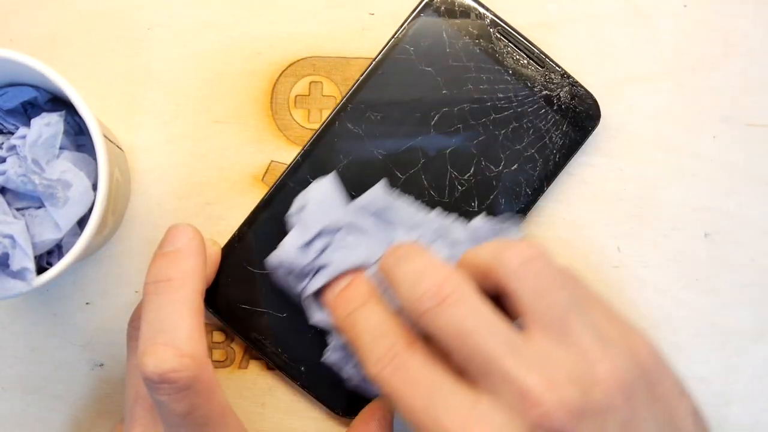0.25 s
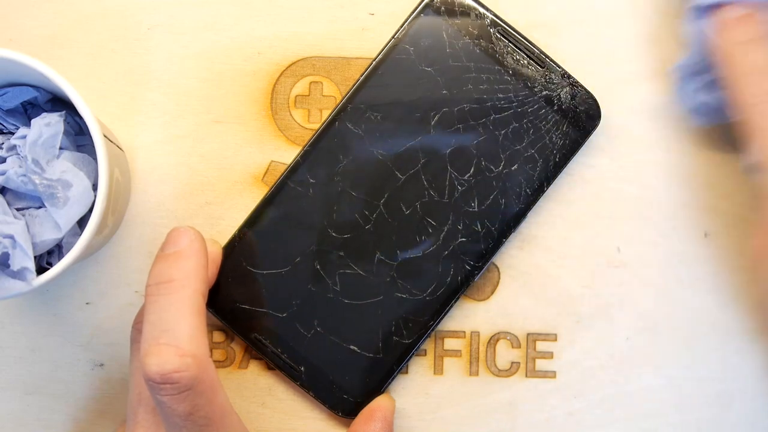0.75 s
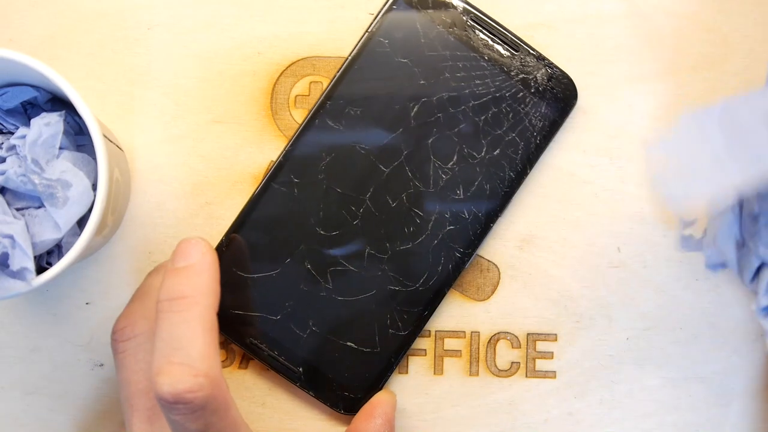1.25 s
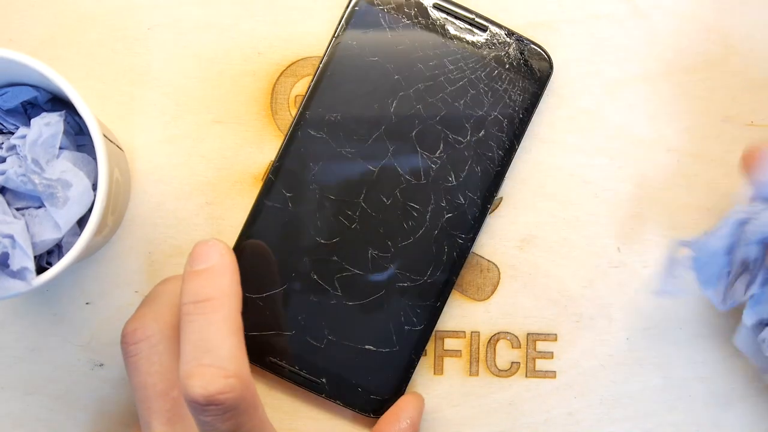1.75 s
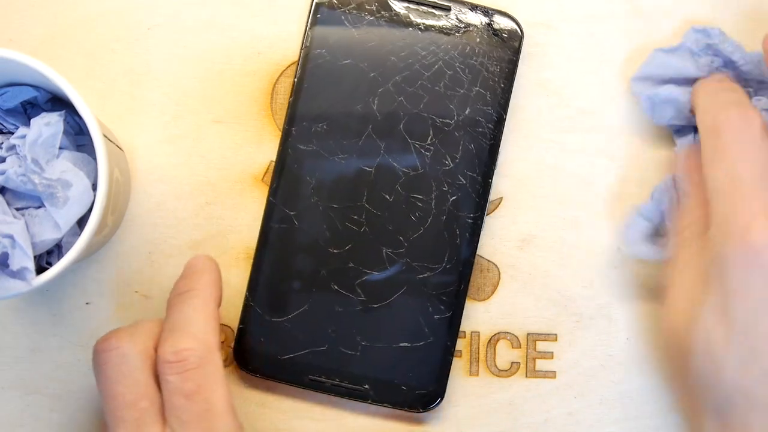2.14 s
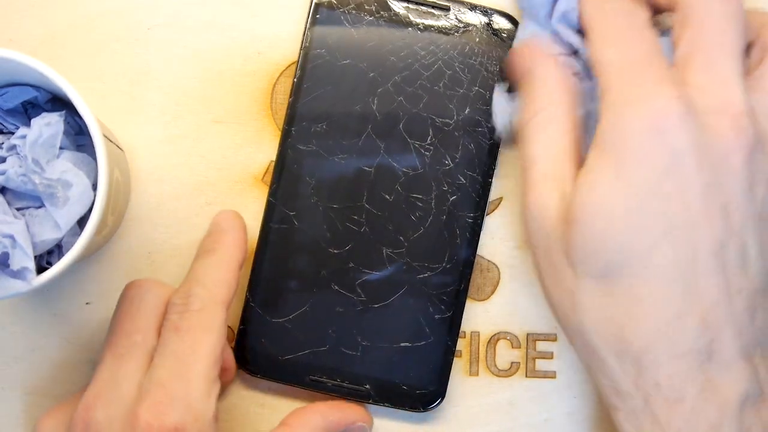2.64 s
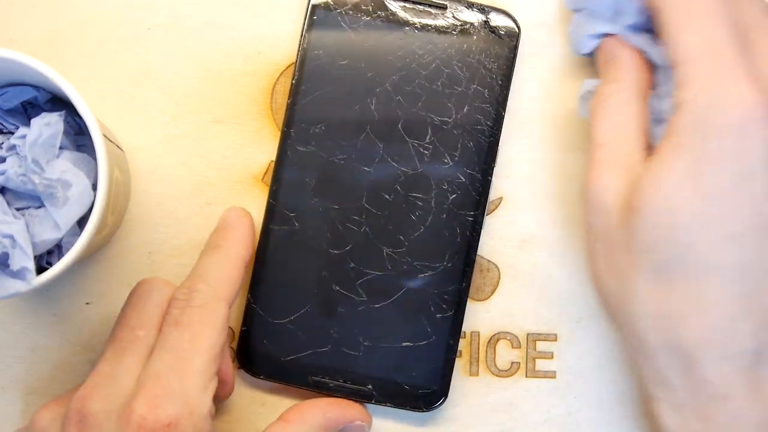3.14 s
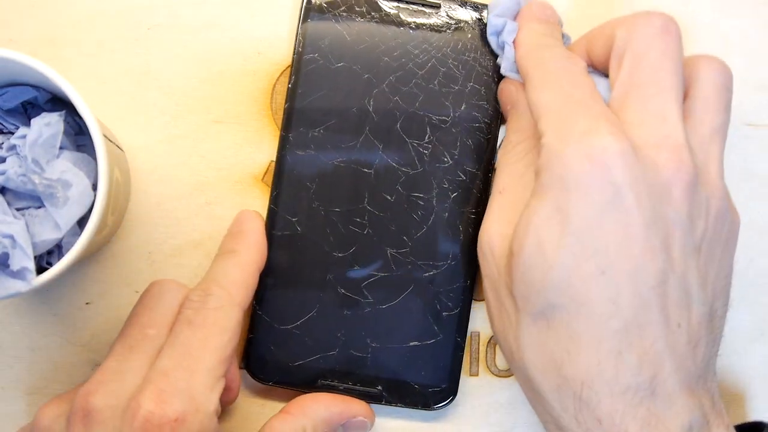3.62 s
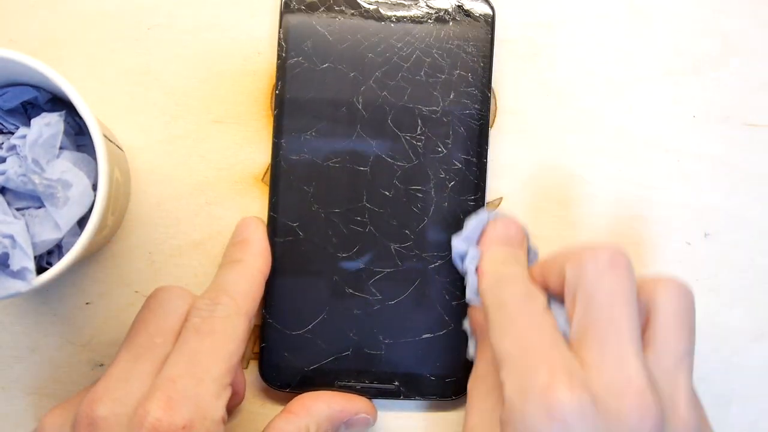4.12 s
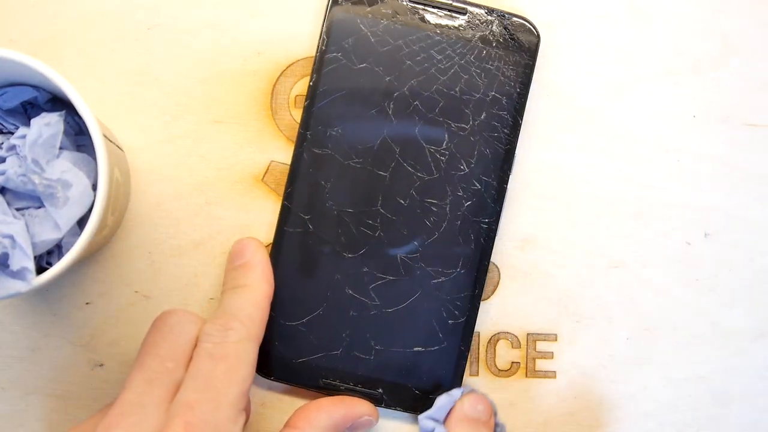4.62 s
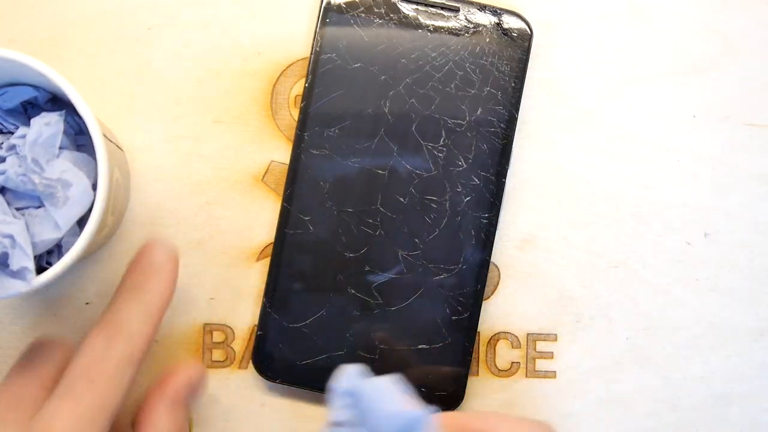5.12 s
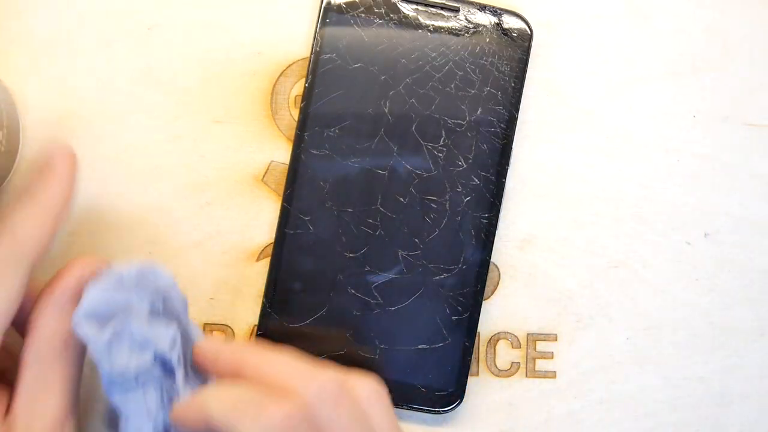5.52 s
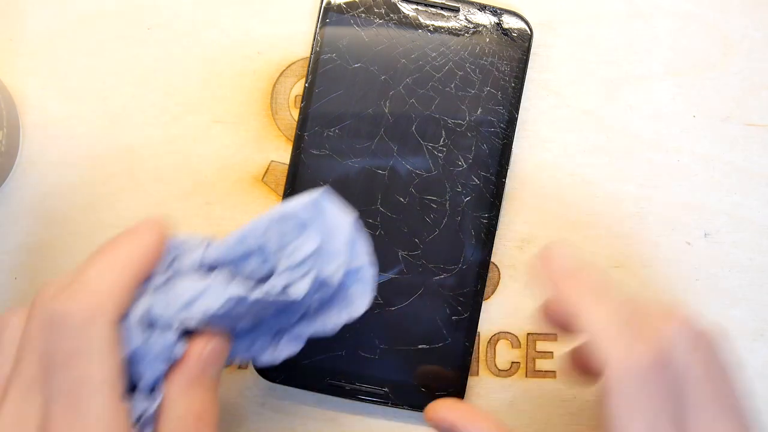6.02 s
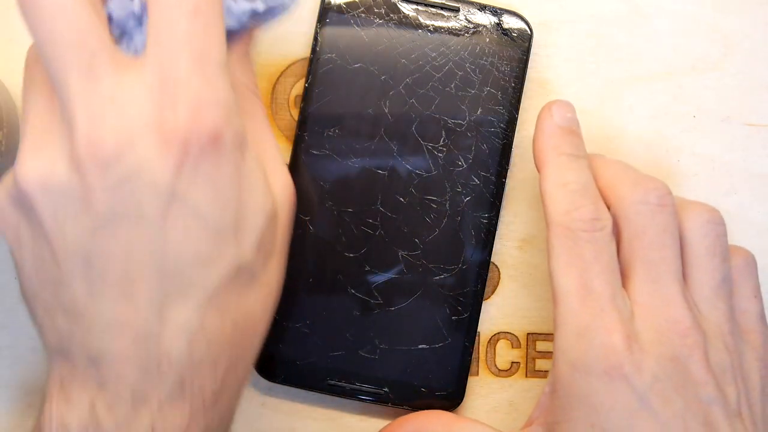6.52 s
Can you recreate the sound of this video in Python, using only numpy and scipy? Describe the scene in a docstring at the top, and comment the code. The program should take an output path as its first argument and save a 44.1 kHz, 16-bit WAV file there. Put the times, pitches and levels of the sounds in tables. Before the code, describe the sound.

A crumpled paper wad scuffs in uneven dry strokes over glass and wood, with crease ticks, small phone knocks and a brief cup scrape.

```python
"""Throughout, paper rubs right at the camera's microphone: a towel wad wipes a phone's glass and the desk round it.
Indoors at close range, shaped noise makes its scuffs and noisy bursts its crease ticks.
The phone, nudged, turned and dropped, knocks as damped modes of case and desk over a low drag rumble.
A paper cup pushed aside rasps and drums as resonant friction noise; the room rumbles low underneath."""
import sys
import numpy as np
from scipy import signal
from scipy.fft import rfft, irfft, next_fast_len
from scipy.io import wavfile
from scipy.ndimage import uniform_filter1d, map_coordinates

SR = 44100
rng = np.random.default_rng(int(sys.argv[2]) if len(sys.argv) > 2 else 0)


def log_audio(samples):
    """Write samples as a 16-bit WAV file to the path given in sys.argv[1]."""
    # one column per channel
    frames = np.atleast_2d(samples).T
    # limit to full scale, then quantise
    limited = np.clip(frames, -1, 1)
    pcm = np.round(limited * 32767).astype(np.int16)
    wavfile.write(sys.argv[1], SR, pcm)


N = 298616  # length in samples

# Background rumble of the room: pitch_hz, relative density_db_per_hz
ROOM_COLOUR = [(12, -14), (26, 6), (45, 4), (66, 1.5), (85, -7.5), (105, -6.5), (125, -9), (165, -15.5),
               (330, -19), (550, -24), (2000, -28.5), (10000, -34), (15500, -40)]

# Likeness of the two microphone ports: pitch_hz, likeness (0 to 1)
PORT_LIKENESS = [(60, 0.96), (150, 0.81), (380, 0.79), (1000, 0.96), (2300, 1), (3500, 0.96), (4800, 0.85),
                 (8000, 0.72), (11000, 0.56), (15000, 0.43)]
# Level balance of the ports: pitch_hz, left_minus_right_db
PORT_BALANCE = [(60, 0.5), (650, 3), (1800, 2.2), (4800, 2.5), (7000, 2), (8500, 0), (10300, -2.5),
                (12000, -2), (15000, 0)]
# Phase between the ports: pitch_hz, left_lead_radians
PORT_LEAD = [(100, 0.16), (8300, 0), (10000, 0), (12000, 0.74), (15000, 1.4)]
# The hand crosses the desk in front of the microphone: time_s, left_delay_samples
HAND_CROSSING = [(0, 0.013), (1.2, -0.62), (2.5, -0.38), (3.8, -0.061), (4.6, -0.02), (5.3, 0.52),
                 (5.8, 0.074), (6.77, 0.27)]
BAND_LIMIT_HZ = 15750

# Fingers drag the phone round: start_s, rise_s, hold_s, fall_s, level_db
DRAGS = [(1.2, 0.45, .4, .35, -48), (2.17, 0.087, .02, 0.11, -39), (2.673, 0.048, 0.16, 0.21, -36),
         (2.9, .1, 0.33, .08, -47)]
# Colour of the dragging: pitch_hz, relative density_db_per_hz
DRAG_COLOUR = [(25, -1), (50, 7.5), (80, 2.5), (112, 1.5), (135, 2), (165, -15), (200, -20), (250, -40),
               (500, -35), (1500, -56)]

# Pushes of the cup: start_s, rise_s, hold_s, fall_s, rasp_level_db, drum_level_db
CUP_PUSHES = [(5.227, 0.021, 0.018, 0.12, -37, -59), (5.301, 0.12, .03, 0.045, -38, -54),
              (5.451, 0.032, 0.026, .035, -39.5, -64)]
# Colour of the cup's scrape: pitch_hz, relative density_db_per_hz
CUP_COLOUR = [(150, -2), (260, -3), (600, -7), (1200, -7), (2800, -9.5), (4000, -4.5), (5400, 1.5),
              (7300, -0.5), (9400, -2), (10500, -4.5), (15500, -22)]
# Resonances of the cup's wall: pitch_hz, width_hz, level_db (re a flat response)
CUP_WALL = [(746, 110, 3), (1690, 64, 7), (3850, 400, -4), (8350, 400, 8.5), (9100, 500, -2)]
# Hollow modes of the cup: pitch_hz, width_hz, relative level_db
CUP_HOLLOW = [(292, 28, 0.5), (500, 31, -4), (736, 90, -15)]

# The hand lands with the wad: time_s, relative level_db
LANDINGS = [(2.269, -25), (2.277, -23.5)]
# Modes of the soft landing: pitch_hz, relative level_db before scatter, decay_t60_s
PAD_MODES = [(62.5, 5, 0.12), (106, -10, 0.051), (274, -4, 0.042), (378, -2, 0.044), (466, -9, 0.077),
             (640, -8, 0.042), (1085, -8, 0.047), (1480, -15, 0.034), (2000, -4, .06)]

# The phone judders on the desk: time_s, relative thud_db, clack_db (re thud, before a common trim)
PHONE_BUMPS = [(2.703, -30.5, -12), (2.772, -31.5, -9), (2.824, -28, -25), (2.875, -30, -5.5),
               (2.961, -23.5, -8), (2.973, -32, -27), (3.063, -26, -7.5), (3.077, -23.5, -17),
               (3.123, -31, -15), (3.167, -26.5, -8), (3.179, -41, -11), (3.248, -27, -10),
               (3.317, -36, -13)]
# Let go, the phone drops flat and bounces: time_s, relative thud_db, clack_db (re thud, before the trim)
PHONE_DROP = [(4.836, -25, -0.5), (4.8435, -31, -3.5)]
# Modes of the desk top: pitch_hz, relative level_db before scatter, decay_t60_s
DESK_MODES = [(109, -2, 0.23), (128, 0, 0.094), (187.8, -4.5, 0.2), (266, -13, 0.15), (351, -16, 0.098),
              (399, -13, 0.073)]
# Modes of the phone: pitch_hz, relative level_db before scatter, decay_t60_s
PHONE_MODES = [(605, -7.5, 0.087), (863, -4, 0.094), (1110, -9, 0.033), (1350, -2, 0.019), (1514, 2, 0.022),
               (1700, -5, 0.028), (2300, -4, 0.013), (3000, -12, 0.011)]
BLOW_SCATTER_DB = 2  # standard deviation of each mode's strength, blow to blow

# Crease ticks in the paper: time_s, relative level_db, pitch_hz
CREASE_TICKS = [(0.1506, -36, 2380), (0.328, -33, 2460), (0.822, -42, 2630), (1.05, -41, 2420),
                (1.171, -35, 3120), (1.569, -41, 1980), (2.429, -26, 10400), (2.732, -30, 2140),
                (2.8463, -32, 3580), (5.219, -35, 2000), (5.2653, -26, 9140), (5.685, -31, 2630),
                (6.5023, -29, 3040), (6.7567, -25, 6820)]

# Strokes of the wad: start_s, rise_s, hold_s, fall_s, relative scuff_db,
# body_db (pressed surface), fizz_db (loose edges); the last two re the middle band, before band trims
STROKES = [ (-.03, 0.038, 0.0093, .09, -48.5, -4, 1.5), (0.144, .1, 0.03, 0.093, -45, -6, -2),
           (0.288, 0.095, 0.14, .08, -42, -11, -5.5), (0.497, 0.076, 0.073, 0.062, -34.5, -7, -4),
           (0.606, .08, .025, 0.042, -34, -10, -1), (.7, .03, .01, 0.22, -51.5, -20, 3),
           (.88, 0.12, .01, .05, -54, -15, 0), (1.024, 0.049, .09, .05, -47.5, -5.5, 0.5),
           (1.132, 0.092, 0.058, 0.065, -40.5, -7, -0.5), (1.298, .1, 0.098, 0.054, -47.5, -3.5, 0),
           (1.537, 0.057, 0.067, 0.16, -40.5, -3.5, 1.5), (1.689, 0.088, .02, 0.18, -38, -5.5, 1),
           (1.878, 0.056, 0.012, 0.067, -35.5, -5.5, 0.5), (1.98, 0.093, 0.16, 0.087, -38, -5.5, 0.5),
           (2.264, 0.01, 0.034, 0.046, -34, -4.5, -0.5), (2.288, 0.077, 0.077, 0.1, -34.5, -5.5, 1),
           (2.506, 0.051, 0.018, 0.16, -38, -3, 1), (2.644, 0.11, 0.025, 0.078, -37.5, -3, -1),
           (2.8, .05, .01, 0.086, -40.5, -1, 0), (2.914, 0.047, 0.0055, 0.054, -41, -3.5, 0.5),
           (2.99, 0.066, .02, 0.09, -47, 1, 0), (3.118, 0.044, 0.083, 0.068, -46, -1, 0),
           (3.229, 0.06, .02, 0.2, -42, -4, -1), (3.419, 0.087, .01, 0.12, -41, -6.5, -3),
           (3.553, 0.17, 0.26, 0.6, -34.5, -7, 1), (3.968, .25, 0.14, .17, -36, -9, 0.5),
           (4.377, .12, 0.071, 0.16, -42.5, -6.5, 1.5), (4.675, 0.067, 0.013, 0.035, -41.5, -7.5, 4),
           (4.803, .14, .03, .12, -49.5, -1.5, 1.5), (5.03, .1, 0.092, 0.045, -56, 4.5, -7),
           (5.206, 0.035, .23, 0.09, -46.5, -3, -0.5), (5.539, 0.068, 0.046, .04, -45.5, -0.5, 2),
           (5.658, 0.019, 0.055, 0.084, -39.5, -3.5, 0), (5.762, 0.051, 0.022, 0.053, -33.5, -4.5, 0.5),
           (5.849, 0.067, 0.022, 0.094, -37.5, -3, -0.5), (5.984, 0.098, .01, 0.087, -43.5, -2.5, 0.5),
           (6.122, .15, 0.38, .14, -41.5, -2.5, 0.5), (6.378, 0.038, .01, 0.031, -38.5, -9, 0),
           (6.473, 0.028, .005, .03, -38, -12, 1), (6.722, 0.053, .02, .03, -35, -2, -4), ]
# The held wad rustles faintly under and between strokes; same three levels as a stroke
REST_SCUFF_DB, REST_BODY_DB, REST_FIZZ_DB = -62, -5, 2
# Colour of paper friction: pitch_hz, relative density_db_per_hz
PAPER_COLOUR = [(120, -13), (220, -4.5), (330, -8), (560, -5), (900, -2), (1700, -2), (2300, -4),
                (4000, -3), (7000, -1.56), (9900, -1), (11500, -3.5), (15600, -12.5)]
# Resonances of the rubbed glass: pitch_hz, width_hz, level_db (re a flat response)
GLASS_MODES = [(378, 120, -3), (724, 110, -8.5), (1070, 270, -4), (1400, 110, -15), (2150, 300, -2.5),
               (2575, 200, 0), (3280, 550, -10.5)]
# Resonances of the rubbed wood: pitch_hz, width_hz, level_db (re a flat response)
WOOD_MODES = [(332, 150, 9.5), (765, 64, 6), (1250, 140, -28), (1460, 90, 5), (2150, 400, -1),
              (2520, 220, -29), (3000, 410, -7)]
# Resonances of the groove between phone and desk: pitch_hz, width_hz, level_db (re a flat response)
GROOVE_MODES = [(1127, 107, 8.5), (1400, 160, 5.5), (2030, 290, 3.5), (2340, 140, -8), (2970, 170, -16),
                (3450, 410, -0.5), (4610, 110, -2), (6400, 5300, -10), (9700, 630, -23)]
# Where the wad rubs: time_s, glass_share, groove_share; whatever is left is wood
CONTACT = [(0, 1, 0.48), (.75, 0.82, 0), (1.1, 0.68, 0), (1.5, 0, 0.13), (3.55, 0.44, 0.11), (3.7, 0, 0.46),
           (4.7, 0.54, 1), (4.9, 0.0011, 0.03), (5.6, 0.79, 0.29), (6.0, 0.87, 0), (6.77, 0.7, 0)]
WAD_PAN_DB = -1.94  # extra left-minus-right level


def amp(db):
    """Decibels to gain."""
    return 10 ** (np.asarray(db) / 20)


def unit(x):
    """Scale to rms 1."""
    return x / np.sqrt(np.mean(x ** 2) + 1e-20)


def along(points, hz):
    """Read (pitch_hz, value) points on a log pitch axis."""
    f, v = np.transpose(points)
    return np.interp(np.log(hz + 1), np.log(f + 1), v)


def curves(rows):
    """One value per sample for each column after the time."""
    s, *cols = np.transpose(rows)
    return [np.interp(np.arange(N) / SR, s, c) for c in cols]


def wobble(rate):
    """A smooth random curve, rate knots a second."""
    knots = rng.standard_normal(int(N * rate / SR) + 4)
    return map_coordinates(knots, [np.arange(N) * rate / SR])


def filtered(x, response):
    """Shape x by a response of frequency, with room for the tail."""
    m = next_fast_len(N + SR // 2)
    spectrum = rfft(x, m) * response(np.fft.rfftfreq(m, 1 / SR))
    return irfft(spectrum, m)[..., :N]


def resonant(modes, f):
    """Gain of resonance peaks standing on a flat response."""
    return 1 + sum(amp(db) / (1 + (2 * (f - hz) / width) ** 2) for hz, width, db in modes)


def ring(modes, t, scatter_db):
    """Damped modes of alternating sign, at new strengths for every blow; peak 1."""
    x = np.zeros(len(t))
    for k, (hz, db, t60) in enumerate(modes):
        decay = amp(db + scatter_db * rng.normal() - 60 * t / t60)
        x += (-1) ** k * decay * np.sin(2 * np.pi * hz * t)
    return x / np.abs(x).max()


def add(track, s, sound):
    """Mix a sound in at time s."""
    part = track[..., max(round(s * SR), 0):][..., :sound.shape[-1]]
    part += sound[..., :part.shape[-1]]


def swell(start, rise, hold, fall):
    """A movement gathers speed, runs steadily and slows to a stop; 0 to 1."""
    t = np.arange(N) / SR - start
    rising = t / max(rise, .005)
    falling = 1 - (t - rise - hold) / max(fall, .005)
    return np.clip(np.minimum(rising, falling), 0, 1)


def movements(rows, levels_db):
    """Gain over time of overlapping movements, which add in power."""
    return np.sqrt(sum((amp(db) * swell(*row[:4])) ** 2 for row, db in zip(rows, levels_db)))


def ports(pair):
    """Two unrelated signals reach two ports as mid and side: alike in the bass, apart in the treble."""
    half = np.array([[.5], [-.5]])

    def mid_side(hz):
        turn = np.arccos(np.clip(along(PORT_LIKENESS, hz), -1, 1)) / 2
        return np.array([np.cos(turn), np.sin(turn)])

    def balance(hz):
        return amp(half * along(PORT_BALANCE, hz)) * np.exp(1j * half * along(PORT_LEAD, hz))

    mid, side = filtered(pair, mid_side)
    return filtered(np.array([mid + side, mid - side]), balance)


def placed(x):
    """As the source moves, its sound reaches one port slightly before the other."""
    lag, = curves(HAND_CROSSING)
    n = np.arange(N)
    left = map_coordinates(x[0], [n - lag / 2], order=5)
    right = map_coordinates(x[1], [n + lag / 2], order=5)
    return np.array([left, right])


def friction(catches, spread_db, catch_db, patchy_db):
    """Countless tiny slips, with stronger fibre catches (per second) and a colour that drifts in patches."""
    sizes = amp(spread_db * np.clip(rng.standard_normal(N), -2, 2))
    sizes = sizes * (rng.random(N) < catches / SR)
    snags = unit(sizes * np.sign(rng.standard_normal((2, N))))
    slips = rng.standard_normal((2, N)) + amp(catch_db) * snags
    z = signal.stft(slips, nperseg=1024)[2]
    # random gains smoothed over pitch, then over time
    field = uniform_filter1d(rng.standard_normal(z.shape[1:]), size=5, axis=0)
    field = uniform_filter1d(field, size=9, axis=1)
    patchy = signal.istft(z * amp(patchy_db * unit(field)), nperseg=1024)[1]
    return ports(patchy[:, :N])


def room():
    """Steady low rumble with a trace of hiss: wide noise shaped mostly into the bass."""
    noise = ports(rng.standard_normal((2, N)))
    return amp(-43.5) * unit(filtered(noise, lambda hz: amp(along(ROOM_COLOUR, hz))))


def walls(x, t60):
    """A small room's short, diffuse answer: decaying noise after a 4 ms gap."""
    t = np.arange(SR // 2) / SR
    tail = rng.standard_normal((2, len(t))) * amp(-60 * t / t60) * (t > .004)
    return signal.fftconvolve(x, tail / np.linalg.norm(tail[0]), axes=1)[:, :N]


def drag():
    """The phone's back rubs over the wood and the desk top rumbles: low noise follows each drag."""
    noise = ports(rng.standard_normal((2, N)))
    rumble = unit(filtered(noise, lambda hz: amp(along(DRAG_COLOUR, hz))))
    return movements(DRAGS, np.transpose(DRAGS)[4]) * rumble


def cup():
    """The cup's rim scrapes over the wood with a thin, bright rasp, and its hollow body drums."""
    rasp_db, drum_db = np.transpose(CUP_PUSHES)[4:]
    slips = friction(catches=900, spread_db=-1, catch_db=-4, patchy_db=2.0)
    rasp = unit(filtered(slips, lambda hz: amp(along(CUP_COLOUR, hz)) * resonant(CUP_WALL, hz)))
    # without the flat response, only the hollow peaks are left
    drum = unit(filtered(slips, lambda hz: resonant(CUP_HOLLOW, hz) - 1))
    return rasp * movements(CUP_PUSHES, rasp_db) + drum * movements(CUP_PUSHES, drum_db)


def landing():
    """The hand drops onto the desk, cushioned by the paper, which crunches flat: modes and dulled noise."""
    out, t = np.zeros((2, N)), np.arange(SR // 4) / SR
    for s, db in LANDINGS:
        dull_noise = signal.lfilter([.35], [1, -.65], rng.standard_normal(len(t)))
        crunch = dull_noise * amp(-60 * t / 0.021)
        add(out, s, amp(db + 2.5) * (ring(PAD_MODES, t, BLOW_SCATTER_DB) + crunch))
    return out


def phone():
    """Each slip or bump clacks the phone's case and thuds through the desk top, as damped modes."""
    out, t = np.zeros(N), np.arange(SR // 3) / SR
    for s, db, clack_db in PHONE_BUMPS + PHONE_DROP:
        thud = ring(DESK_MODES, t, BLOW_SCATTER_DB)
        contact_noise = 0.098 * amp(-60 * t / .012) * rng.standard_normal(len(t))
        clack = ring(PHONE_MODES, t, BLOW_SCATTER_DB) + contact_noise
        add(out, s, amp(db - 4) * (thud + amp(clack_db + 3) * clack))
    return out * amp([[.6], [-.6]])  # slightly left of the microphone


def creases():
    """A fold snaps: a sharp crack of noise and a brief papery ring."""
    out, t = np.zeros((2, N)), np.arange(SR // 20) / SR
    for s, db, hz in CREASE_TICKS:
        crack = 0.67 * amp(-60 * t / 0.0039) * rng.standard_normal((2, len(t)))
        # the first row is the mid signal, so the ring is shared by both ports
        crack[0] += 0.66 * amp(-60 * t / 0.023) * np.sin(2 * np.pi * hz * t)
        add(out, s, amp(db) * crack)
    return ports(out)


def shares(scuff_db, body_db, fizz_db):
    """Levels in dB of body, middle and fizz; middle and fizz share the scuff's power."""
    middle_db = scuff_db - 10 * np.log10(1 + amp(fizz_db) ** 2)
    return middle_db + body_db, middle_db, middle_db + fizz_db


def towel():
    """Pressing the wad brings out the body of the surface under it; its loose edges fizz."""
    stroke_db = shares(*np.transpose(STROKES)[4:])
    rest_db = shares(REST_SCUFF_DB, REST_BODY_DB, REST_FIZZ_DB)
    body, middle, fizz = [np.hypot(movements(STROKES, db), amp(rest))
                          for db, rest in zip(stroke_db, rest_db)]
    glass, groove = np.clip(curves(CONTACT), 0, 1)
    wood = np.clip(1 - glass - groove, 0, 1)
    slips = friction(catches=900, spread_db=1.0, catch_db=-7.5, patchy_db=2)

    def rubbed(modes):
        return unit(filtered(slips, lambda hz: amp(along(PAPER_COLOUR, hz)) * resonant(modes, hz)))

    rub = glass * rubbed(GLASS_MODES) + wood * rubbed(WOOD_MODES) + groove * rubbed(GROOVE_MODES)

    def below(edge_hz):
        return filtered(rub, lambda hz: 1 / (1 + (hz / edge_hz) ** 10))

    low, under = below(edge_hz=1970), below(edge_hz=5890)
    mix = body * amp(-0.63) * unit(low)
    mix += middle * amp(-.5) * unit(under - low)
    mix += fizz * amp(1.5) * unit(rub - under)
    # the wad stutters on open surfaces and runs more evenly along the groove
    stutter = 1.6 * wobble(45) + 2.0 * wobble(220)
    flutter = amp(stutter * (0.4454 - 0.5 * groove))
    return mix * flutter * amp(WAD_PAN_DB * np.array([[.5], [-.5]]))


def scene():
    """Rubbing and knocks on the desk close by, over the room; the walls answer only the knocks."""
    knocks = phone() + landing() + creases()
    reflections = amp(-24) * walls(knocks, t60=0.3)
    return placed(towel() + cup()) + drag() + knocks + reflections + room()


def record(dry):
    """The camera keeps nothing above its band limit."""
    return filtered(dry, lambda hz: hz < BAND_LIMIT_HZ)


dry = scene()
out = record(dry)
log_audio(out)
```